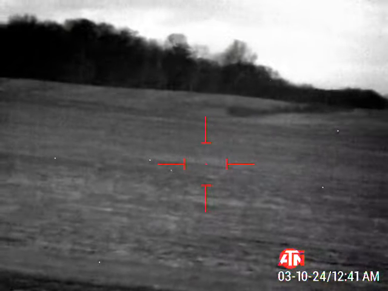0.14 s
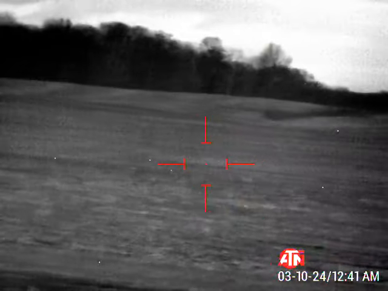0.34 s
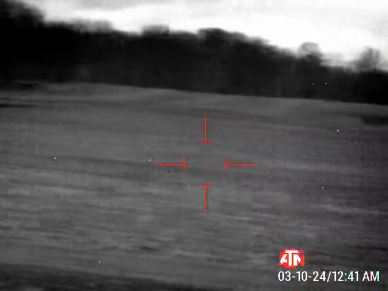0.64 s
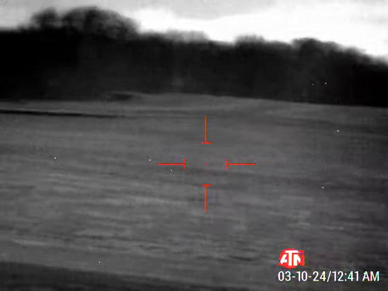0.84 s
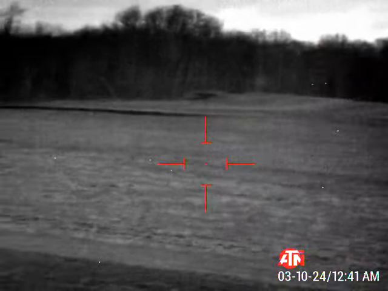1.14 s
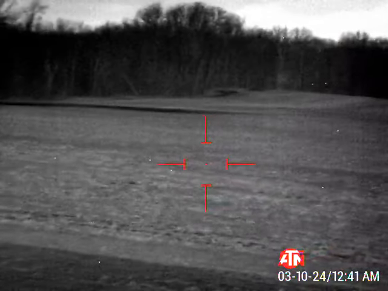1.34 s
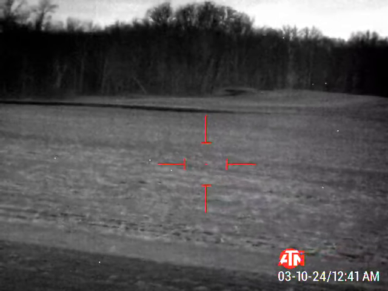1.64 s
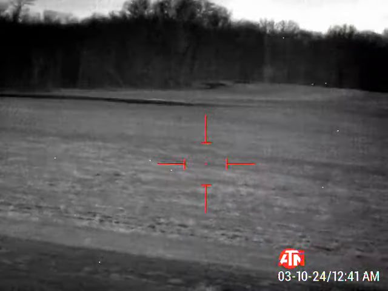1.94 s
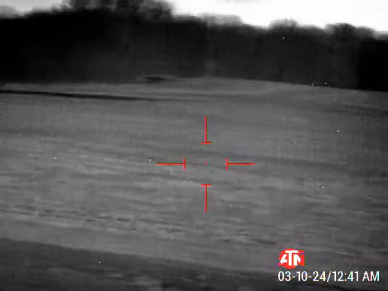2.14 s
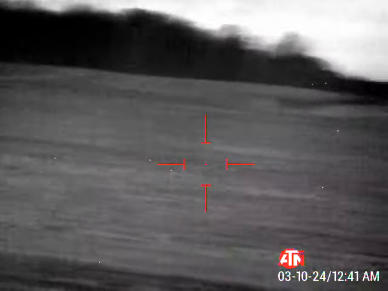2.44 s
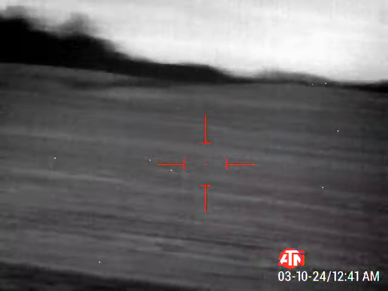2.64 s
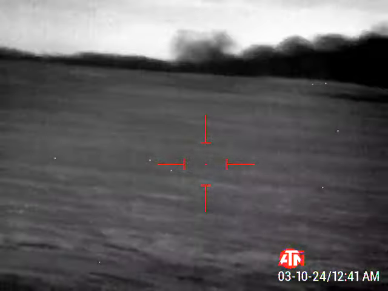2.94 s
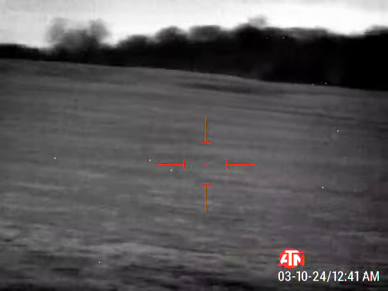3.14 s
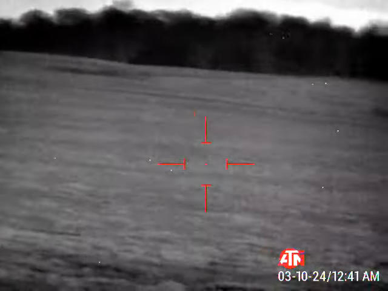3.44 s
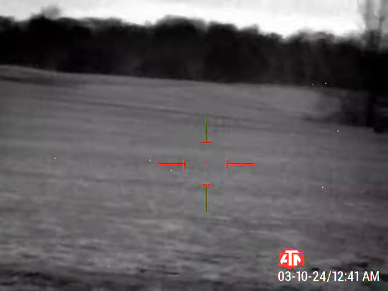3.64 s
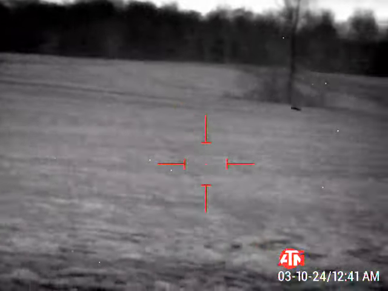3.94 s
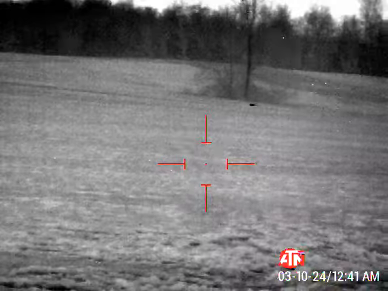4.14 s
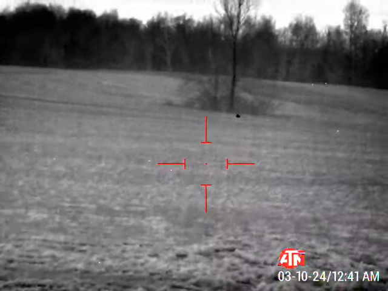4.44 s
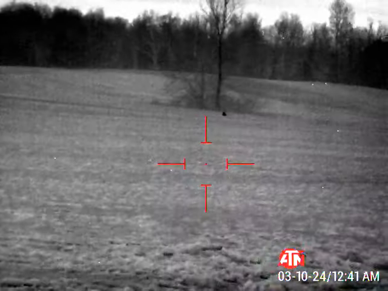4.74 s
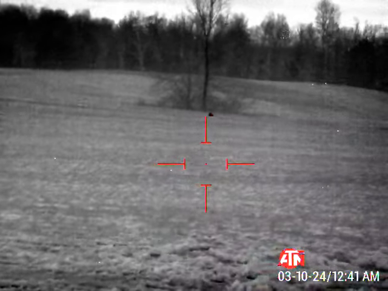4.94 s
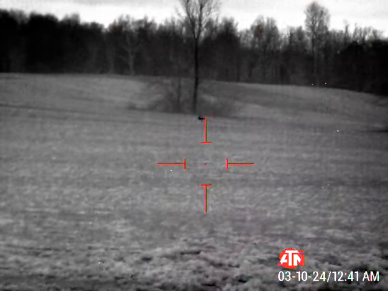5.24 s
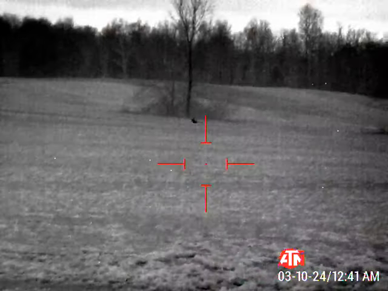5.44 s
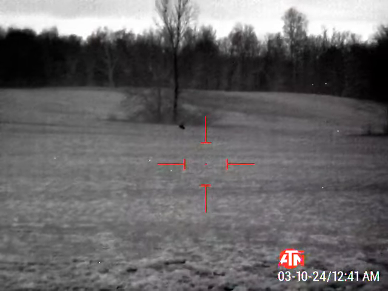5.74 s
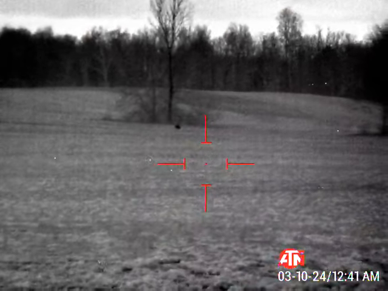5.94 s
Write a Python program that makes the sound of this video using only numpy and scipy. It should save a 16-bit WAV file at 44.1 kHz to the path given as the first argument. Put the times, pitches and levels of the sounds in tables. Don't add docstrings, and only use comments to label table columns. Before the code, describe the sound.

A night field heard through a small camera microphone whose gain ducks after loud sounds and recovers. At 0 s a light metal click follows an earlier shot; its echo swells around 0.5-1 s, bright hiss from twigs and grainy roar from trees, then dulls away. An animal some way off yelps at about 1.15, 1.6, 2.1, 2.6 and 3.2 s, each a strained, high cry of roughly a quarter second, hoarse at its edges and breaking. At 3.44 s a muffled rifle fires right at the microphone, a dry spit of gas and steel, with bolt clatter until 3.6 s. The sound sinks, then echoes surge around 4-4.5 s, with hard knocks at 4.36 and 4.7 s. Yelps return at 4.16, 4.5 and 4.84 s, the last rising higher, then short ones at 5.44, 5.6 and 5.76 s. Faint air and distant machinery hum lie beneath.

```python
import sys
import numpy as np
from scipy import signal
from scipy.fft import rfft, irfft, next_fast_len
from scipy.io import wavfile
from scipy.ndimage import uniform_filter1d, map_coordinates

SR = 44100
rng = np.random.default_rng(int(sys.argv[2]) if len(sys.argv) > 2 else 0)


def wrap_up_sound(samples):
    columns = np.atleast_2d(samples).T
    tamed = np.clip(columns, -1, 1)
    steps = np.round(tamed * 32767).astype(np.int16)
    wavfile.write(sys.argv[1], SR, steps)


def undo_db(level):
    steps = np.asarray(level, float) / 20
    return 10 ** steps


N = 267863

SHOTS = [
    -0.12,
    3.437,
]


def unit(x):
    return x / np.sqrt(np.mean(x ** 2) + 1e-20)


def along(points, hz):
    f, v = np.transpose(points)
    return np.interp(np.log(hz + 1), np.log(f + 1), v)


def wobble(rate, n=N):
    knots = rng.standard_normal(int(n * rate / SR) + 4)
    return map_coordinates(knots, [np.arange(n) * rate / SR])


def filtered(x, response):
    m = next_fast_len(len(x) + 8192)
    return irfft(rfft(x, m) * response(np.fft.rfftfreq(m, 1 / SR)), m)[:len(x)]


def resonances(modes):
    def response(f):
        return sum((-1) ** k * undo_db(db) * 1j * f * wide / (hz * hz - f * f + 1j * f * wide)
                   for k, (hz, wide, db) in enumerate(modes))
    return response


def gain_db():
    # (start [s], held until [s], depth [dB], recovery [s])
    ducks = [(-.12, 0.775, 14, 0.51), (0.945, 1.0, 11, 0.18), (1.179, 1.291, 10.5, 0.22),
             (1.58, 1.725, 9.5, 0.19), (2.174, 2.324, 5, 0.049), (2.65, 2.838, 11, 0.099),
             (3.447, 4.4, 14, 0.55), (4.502, 4.62, -1, 0.11), (4.718, 4.77, 2.5, 0.035),
             (4.852, 5.1, 9.5, .11), (5.638, 5.73, 11, 0.18)]
    fall_s = 0.06
    t, total = np.arange(N) / SR, np.zeros(N)
    for s, until, db, back in ducks:
        hold_end = max(until, s + fall_s)
        total -= np.interp(t, [s, s + fall_s, hold_end, hold_end + back], [0, db, db, 0])
    return total


def scatter(spectrum, patchy_db, grain_db, grain_rate):
    grains = rng.standard_normal(N) * undo_db(grain_db * wobble(grain_rate))
    z = signal.stft(grains, nperseg=256)[2]
    field = uniform_filter1d(rng.standard_normal(z.shape), size=4, axis=0)
    field = uniform_filter1d(field, size=10, axis=1)
    rough = signal.istft(z * undo_db(patchy_db * unit(field)), nperseg=256)[1][:N]
    return unit(filtered(rough, lambda hz: undo_db(along(spectrum, hz))))


def belts(rows):
    t = np.arange(N) / SR
    since = t - np.where(t < SHOTS[1], *SHOTS)
    power = sum(undo_db(db - np.maximum(rise * (s - since), fall * (since - s))) ** 2
                for s, db, rise, fall in rows)
    return np.sqrt(power)


def rifle():
    # (time [s], peak [dB], thud [dB], edge [dB], ring-down [s])
    blast = [(3.4327, -21.5, 2, -33, 0.0087), (3.4362, -12, -2.5, -24.5, 0.0042),
             (3.4382, -4, -2, -23, 0.0093), (3.4418, 3.5, -23.5, -10.5, 0.0072),
             (3.4439, -0.5, -14, -24.5, 0.0034)]
    bolt = [(3.445, -41, -9.5, -16, 0.027), (3.451, -29, -3, -12, 0.03), (3.46, -29.5, -21, -11, .03),
            (3.468, -28.5, -10, -11, 0.036), (3.4837, -34, -2, -10.5, 0.019),
            (3.499, -29.5, -13.5, -28, 0.064), (3.5116, -21.5, -16, -7, 0.016),
            (3.514, -22, -16.5, -5, 0.036), (3.52, -28, -27, -13, 0.029)]
    latch = [
        (0.0525, -26, -10, -8, 0.0089),
        (3.5985, -30.5, -5.5, -18, 0.01),
    ]
    # (centre [Hz], width [Hz], level [dB])
    steel_modes = [(4350, 1100, 7), (6520, 2000, 1.5)]
    stock_modes = [(600, 700, 13), (1480, 2700, -11)]
    rise_share = 0.037
    parts, t = np.zeros((3, N + SR)), np.arange(SR // 10) / SR
    for s, db, thud_db, edge_db, t60 in blast + bolt + latch:
        rise = 1 - np.exp(-t / max(rise_share * t60, 1e-4))
        shape = undo_db(db - 60 * t / max(t60, .002)) * rise
        levels = undo_db([[6], [thud_db + 9.0], [edge_db - 2.5]])
        parts[:, round(s * SR):][:, :len(t)] += levels * shape * rng.standard_normal((3, len(t)))
    steel, stock, edge = parts[:, :N]

    def steel_response(f):
        return resonances(steel_modes)(f) * (11000 / (11000 + 1j * f)) ** 2 * 1j * f / (2000 + 1j * f)

    def stock_response(f):
        return resonances(stock_modes)(f) * (1j * f / (180 + 1j * f)) ** 3

    ring = filtered(steel, steel_response)
    thud = filtered(stock, stock_response)
    return ring + thud + filtered(edge, resonances([(9760, 4500, 0.00039)]))


def slaps():
    # (time [s], peak [dB], centre [Hz], ring-down [s])
    returns = [(.583, -29, 1800, .015), (.648, -28, 1300, .008), (.7, -28, 1300, .012),
               (.735, -38, 200, .08), (4.03, -27, 650, .02), (4.361, -11, 1900, .012),
               (4.378, -22, 2300, .012), (4.699, -15, 1100, .012), (4.7018, -8, 1900, .01),
               (4.7215, -18, 1800, .008), (4.7232, 1, 1500, .0045), (4.865, -20, 800, .012)]
    out, t = np.zeros(N + SR), np.arange(SR // 20) / SR
    onset = (1 - np.exp(-t / .0004)) ** 2
    for s, db, hz, t60 in returns:
        knock = np.sin(2 * np.pi * hz * t) + .5 * np.sin(2 * np.pi * 2.0 * hz * t)
        knock += 0.12 * np.sin(2 * np.pi * 4500 * t)
        out[round(s * SR):][:len(t)] += undo_db(db - 60 * t / t60) * knock * onset
    return out[:N]


def growl():
    # (time after the shot [s], centre [Hz], level [dB])
    sinking = [(.13, 478, -63.5), (.22, 470, -54.5), (.35, 310, -51), (.5, 230, -49.5), (.85, 205, -58.5),
               (1.25, 200, -58), (1.5, 188, -70)]
    t, out = np.arange(N) / SR, np.zeros(N)
    after_s, centre_hz, level_db = np.transpose(sinking)
    for shot in SHOTS:
        hz = np.interp(t, after_s + shot, centre_hz)
        db = np.interp(t, after_s + shot, level_db)
        lumps = (wobble(170) + 1j * wobble(170)) * undo_db(1.1 * wobble(30))
        out += undo_db(db) * np.real(lumps * np.exp(2j * np.pi * np.cumsum(hz) / SR))
    return out


def tree_echoes():
    # (loudest after the shot [s], level [dB], rise [dB/s], fall [dB/s])
    far_belts = [(.57, -42.5, 3, 330), (1.05, -24, 160, 36), (2.1, -34, 9.8, 9.7)]
    near_belts = [(.57, -37.5, 28, 19), (.92, -21, 150, 15), (2.4, -48.5, 3.2, 8)]
    brush_belts = [(.92, -19.5, 250, 42), (1.05, -21.5, 60, 120)]
    twig_belts = [(.58, -26.5, 49, 48), (1.0, -30.5, 19, 80.5), (1.63, -49.5, 39, 80)]
    fizz_belts = [(.85, -59.5, 35, 60.5)]
    # (frequency [Hz], level [dB])
    far_colour = [(120, -38.5), (250, -20), (450, 2), (650, 5.5), (1100, 1.5), (1800, -9), (3000, -19.5),
                  (5000, -68)]
    near_colour = [(400, -62), (800, 1.5), (1300, 3.5), (2200, 3), (3200, -8), (4500, -15.5), (5500, -33),
                   (8000, -64)]
    brush_colour = [(1400, -30.5), (2400, 6), (3600, 5), (4600, -2.5), (6000, -55.5)]
    twig_colour = [(1200, -34), (2200, -14.5), (3300, -9.5), (4500, 3.5), (5300, -10.5), (6500, -27),
                   (8500, -43.5), (13000, -74.5)]
    fizz_colour = [(5000, -34), (7000, 4), (15000, -5), (15600, -39.5)]
    # (time [s], level [dB], width [s])
    surges = [(.93, -2, 0.034), (1.18, 0.5, 0.019), (1.26, -1, 0.024), (1.5, 1, 0.075), (1.63, -2.5, 0.027),
              (1.9, 1.5, 0.026), (2.409, 5, 0.015), (2.62, 3, 0.04), (3.25, -4.5, 0.054),
              (3.38, -5.5, 0.051), (4.035, 9.5, 0.022), (4.2, 5.5, 0.086), (4.31, -15, 0.045),
              (4.5, 2.5, 0.038), (4.85, 1.5, 0.014), (4.91, -8, 0.026), (5.07, -7.5, 0.021),
              (5.45, 3.5, .03), (5.66, 1.5, 0.022)]
    t = np.arange(N) / SR
    surge = undo_db(sum(db * np.exp(-((t - s) / width) ** 2) for s, db, width in surges))
    far = belts(far_belts) * scatter(far_colour, patchy_db=0.5, grain_db=2.0, grain_rate=130)
    near = belts(near_belts) * scatter(near_colour, patchy_db=1, grain_db=3, grain_rate=350)
    brush = belts(brush_belts) * scatter(brush_colour, patchy_db=1, grain_db=3, grain_rate=500)
    twigs = belts(twig_belts) * scatter(twig_colour, patchy_db=2.5, grain_db=0.5, grain_rate=270)
    fizz = belts(fizz_belts) * scatter(fizz_colour, patchy_db=-3.5, grain_db=1.0, grain_rate=60)
    return undo_db(gain_db()) * (surge * (far + near + brush) + undo_db(10.5) * twigs + fizz)


def cry(call, melody, clarity, muzzle):
    # (frequency [Hz], level [dB])
    throat = [(800, -50), (1300, -16.5), (1900, -8), (2700, -1.5), (3500, 3.5), (4000, 5.5), (4500, 0),
              (5000, -21), (5700, -30), (6800, -55), (9000, -75)]
    start, length, db, swell_db = call
    first, top_s, top, last, flat = melody
    clear_from, clear_until, *shares = clarity
    tilt_db, chest_db, _, top_db = muzzle
    attack_s, release_s, break_s = 0.022, 0.058, .027
    flip_at_s, flip_s, flip_hz = 2.183, .026, 205
    whistle_hz, whistle_wide_hz, whistle_db = 4280, 170, 6
    end = start + length
    t = np.arange(round(start * SR), round(end * SR)) / SR
    n = len(t)

    def colour(f):
        tilt = tilt_db * np.log2((f + 1) / 3500)
        chest = chest_db / (1 + (f / 1800) ** 6)
        highest = top_db / (1 + (4800 / (f + 1)) ** 20)
        return undo_db(along(throat, f) + tilt + chest + highest)

    def breath_colour(f):
        whistle = undo_db(whistle_db) * np.exp(-((f - whistle_hz) / whistle_wide_hz) ** 2)
        return colour(f) ** 1.3 * (1 + whistle)

    off_top = np.interp(t, [start, top_s, end], [1, 0, 1]) ** flat
    arch = top + off_top * (np.where(t < top_s, first, last) - top)
    arch = arch + flip_hz * np.exp(-((t - flip_at_s) / flip_s) ** 2)
    pitch = arch * (1 + .011 * wobble(148.0, n))
    phase = 2 * np.pi * np.cumsum(pitch) / SR
    flicker = 1.25 * wobble(110, n)
    clear = np.zeros(n)
    for k in range(1, 9):
        level = colour(k * pitch) * undo_db(flicker + 3.46 * wobble(162.3, n))
        clear += level * np.sin(k * phase + rng.uniform(0, 2 * np.pi))
    breath = rng.standard_normal(n) * (1 + 0.97 * np.cos(phase)) * undo_db(flicker)
    breath = filtered(breath, breath_colour)
    turns = [clear_from - break_s, clear_from, clear_until, clear_until + break_s]
    hoarse = np.interp(t, turns, np.array(shares)[[0, 1, 1, 2]])
    voice = np.sqrt(1 - hoarse) * unit(clear) + np.sqrt(hoarse) * unit(breath)
    edge = np.clip(np.minimum((t - start) / attack_s, (end - t) / release_s), 0, 1)
    return edge * undo_db(db + swell_db * (t - start) / length - 6) * voice


def yelps():
    # (start [s], length [s], level [dB], swell over the cry [dB])
    calls = [(1.152, 0.26, -25.5, -3.5), (1.567, 0.32, -24, -6.5), (2.084, 0.27, -25.5, 0.5),
             (2.607, 0.3, -23.5, -7), (3.165, 0.21, -28.5, 1), (4.158, 0.23, -29.5, 3),
             (4.503, 0.065, -25, -4), (4.839, 0.28, -27.5, 3), (5.438, 0.073, -25.5, -8),
             (5.612, .155, -23, -4), (5.763, 0.17, -28.5, 1.5)]
    # (first [Hz], top at [s], top [Hz], last [Hz], flatness of the top [exponent])
    melodies = [(640, 1.245, 709, 628, 2), (800, 1.755, 921, 825, 1.7), (866, 2.19, 988, 902, 1.3),
                (815, 2.76, 998, 835, 1.6), (621, 3.27, 671, 630, 2.1), (725, 4.4, 866, 864, 4.8),
                (866, 4.52, 861, 830, 1.5), (1045, 5.065, 1256, 1250, 1.25), (698, 5.49, 712, 710, 1.5),
                (765, 5.692, 895, 850, 2.1), (775, 5.79, 838, 795, 1.05)]
    # (clear from [s], clear until [s], hoarseness before, during, after [0-1])
    clarities = [(1.205, 1.33, .8, .015, .85), (1.65, 1.775, .75, .025, .85), (2.11, 2.31, .4, .04, .8),
                 (2.675, 2.82, .85, .03, .9), (3.22, 3.31, .8, .22, .9), (4.2, 4.34, .1, .015, .6),
                 (4.55, 4.6, .3, .05, .05), (4.88, 5.045, .4, .025, .75), (5.47, 5.48, .85, .85, .85),
                 (5.65, 5.71, .6, .025, .75), (5.79, 5.86, .5, .1, .75)]
    # (brightness [dB/octave], chest [dB], sent to the trees [dB], top overtones [dB])
    muzzles = [(-4, -13, -4, 2), (-3, -9, -9, 0), (0, 5, -5, 11), (-3, 1, 5.5, 2), (8, 37, -4, 10),
               (-2, -2, -5, 0), (6, -6, -5, 0), (-5, -2, -6, 13), (3, 0, -11, 0), (-7, -4, -10, 2),
               (-6, 1, -12, 6)]
    # (delay [s], level [dB])
    bounces = [(.005, -10), (.011, -6), (.019, -5)]
    out, sent = np.zeros((2, N))
    for call, melody, clarity, muzzle in zip(calls, melodies, clarities, muzzles):
        one = cry(call, melody, clarity, muzzle)
        first = round(call[0] * SR)
        out[first:][:len(one)] += one
        sent[first:][:len(one)] += undo_db(muzzle[2] + 1) * one

    def ground(f):
        return 1 + sum(undo_db(db) * np.exp(-2j * np.pi * f * s) for s, db in bounces)

    out = filtered(out, ground)
    t = np.arange(SR // 2) / SR
    tail = rng.standard_normal(len(t)) * undo_db(-60 * t / 1.1)
    tail = filtered(tail, resonances([(4290, 130, 0), (3200, 700, -11)]))
    smeared = np.pad(sent * wobble(300), (SR // 20, 0))
    late = signal.fftconvolve(smeared, tail / np.linalg.norm(tail))[:N]
    return out + undo_db(gain_db() - 24) * late


def night_air():
    # (frequency [Hz], level [dB])
    night_colour = [(30, -29.5), (90, -32.5), (170, -14), (300, -9), (550, 4), (1500, -22.5), (2500, -15),
                    (4300, -11), (5700, -22.5), (9000, -28), (15000, -31), (15600, -61.5)]
    floor_db = -69.5
    air = scatter(night_colour, patchy_db=.3, grain_db=.3, grain_rate=60)
    return undo_db(gain_db() + floor_db + 22.5) * air


def machinery():
    # (frequency [Hz], level [dB])
    tones = [(120, -79.5), (180, -66.5), (240, -68), (300, -65.5), (480, -58)]
    t = np.arange(N) / SR
    hum = sum(undo_db(db + 3.5 * wobble(25)) * np.sin(2 * np.pi * hz * t) for hz, db in tones)
    return undo_db(0.69 * gain_db() + 4) * hum


def scene():
    shot = rifle() + slaps() + growl() + tree_echoes()
    return (shot + yelps() + night_air() + machinery())[None]


def top_cut(x):
    return signal.sosfilt(signal.butter(12, 16460, fs=SR, output="sos"), x)


def record(dry):
    x = dry[0] / (1 + np.abs(dry[0] / .56) ** 6) ** (1 / 6)
    x = filtered(x, lambda hz: (1j * hz / (140 + 1j * hz)) ** 2 / (1 + (hz / 15500) ** 30))
    return top_cut(x[None])


dry = scene()
out = record(dry)
wrap_up_sound(out)
```